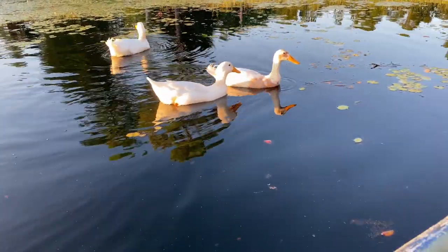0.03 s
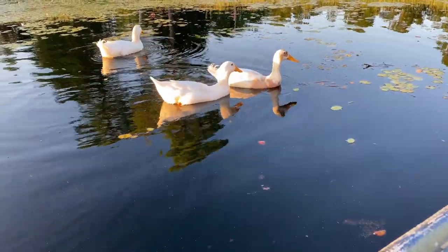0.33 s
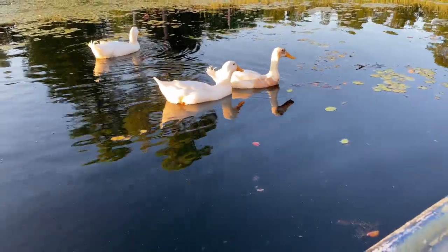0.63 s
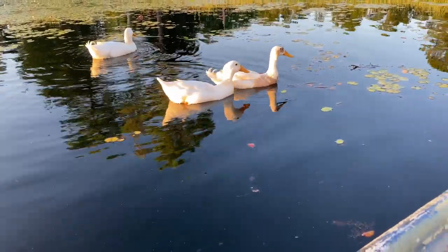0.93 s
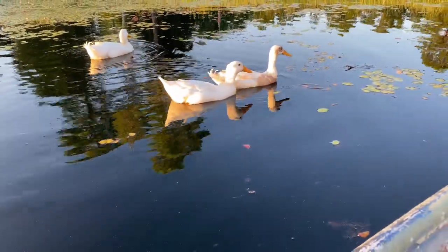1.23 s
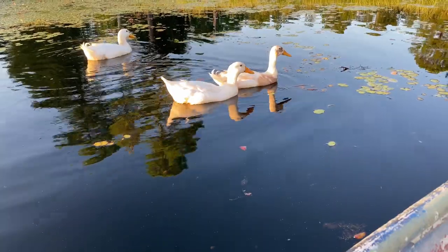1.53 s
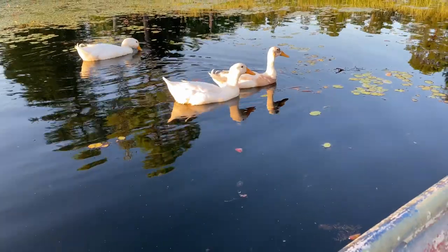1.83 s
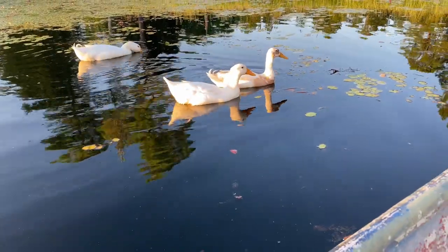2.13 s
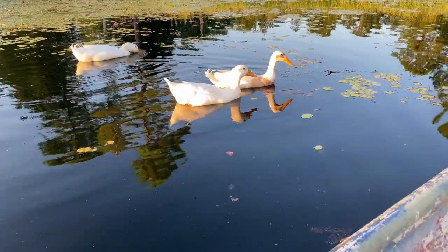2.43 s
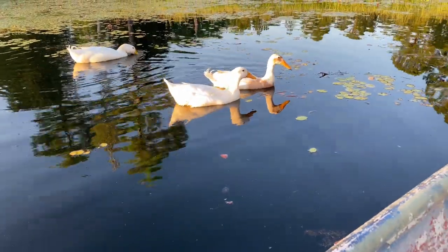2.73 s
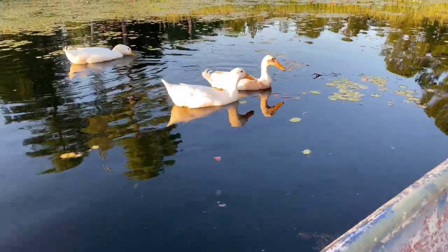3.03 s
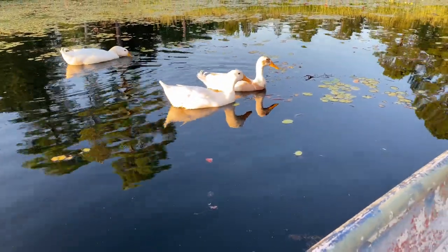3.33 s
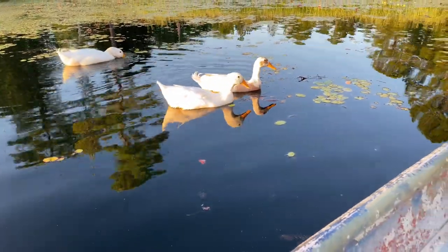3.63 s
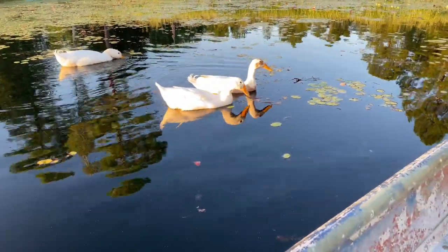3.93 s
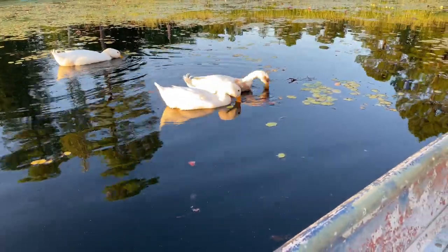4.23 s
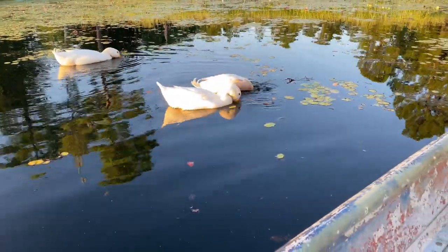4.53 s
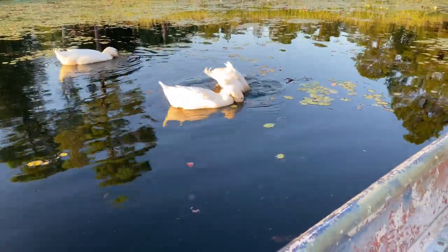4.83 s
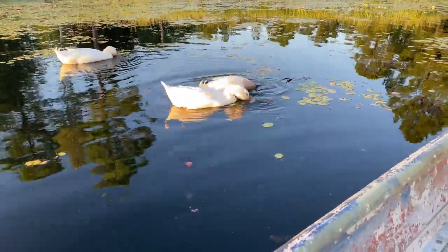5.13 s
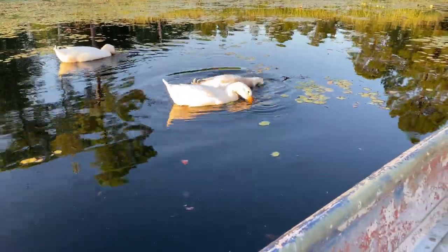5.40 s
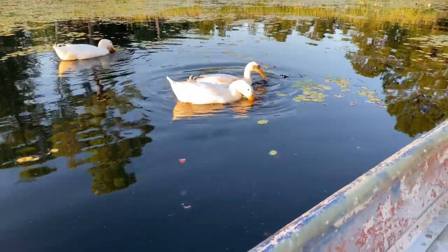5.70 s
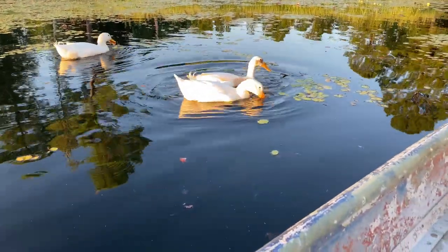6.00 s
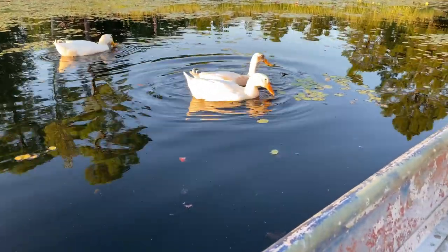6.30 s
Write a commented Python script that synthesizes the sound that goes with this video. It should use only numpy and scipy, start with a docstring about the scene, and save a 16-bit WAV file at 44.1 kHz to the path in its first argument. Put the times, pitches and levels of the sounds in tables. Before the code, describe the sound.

Throughout, a distant engine drones steadily over a low outdoor rumble, the strongest layer in a quiet scene, while a thin, very high hiss like insects comes from the right. In the first half second a duck gives two soft, short, rattling mutters. From about 1.4 seconds, ducks dabbling slightly to the left make sparse, faint drips and splashes, with a small slap at 1.9 and a clearer rising plop at 3.1 seconds. Stirred water crackles finely from about 2.5 seconds on. From 2.7 to 5 seconds a faint songbird trills on the right, rapidly repeating one falling whistled note. Another small splash comes near 4.4 seconds. The drips, bubbly plops and little splashes fall thickest from 5.3 to 6.2 seconds, and the duck mutters softly three more times between 5.7 and 6.2 seconds.

```python
"""Ducks dabble on a still pond. From the start something like a far engine drones over a low rumble,
and a thin hiss, like insects in the reeds, comes from the right. A duck mutters in soft pulses through
its throat; then drops and splashes tick and plop as trapped bubbles ring, and stirred water crackles.
From 2.7 s to 5 s a songbird trills in the trees to the right, repeating one whistled note.
Near the end the drops fall thickest and the duck mutters again."""
import sys
import numpy as np
from scipy import signal
from scipy.fft import rfft, irfft
from scipy.io import wavfile

SR = 44100
rng = np.random.default_rng(int(sys.argv[2]) if len(sys.argv) > 2 else 0)


def wav_out(sig):
    """Save sig, one row per channel (or a flat mono array), as 16-bit PCM at SR to the path in sys.argv[1]."""
    wavfile.write(sys.argv[1], SR, np.round(np.clip(np.atleast_2d(sig).T, -1, 1) * 32767).astype(np.int16))


N = 280476
TIME = np.arange(N) / SR
BIN_HZ = np.maximum(np.arange(N // 2 + 1) * SR / N, 1)

# Drops falling from bills and feathers. Each row: start in seconds, level in dB, starting pitch in Hz,
# ring length in cycles, pitch rise as a share, lag of the right side in ms.
FALLING_DROPS = [(1.3635, -66.5, 3700, 50, .05, 0), (1.9164, -61.5, 4850, 44, .1, 0),
                 (1.9296, -49, 6900, 44, 0, 0), (1.9429, -48, 1350, 4, .2, 0),
                 (2.8887, -62, 4150, 36, .15, 0), (3.1245, -37, 2200, 14, 1.7, .16),
                 (3.9848, -58.5, 4750, 44, .15, 0), (4.3728, -51, 1430, 44, .12, 0),
                 (4.6652, -51.5, 920, 12, .25, 0), (4.7595, -53.5, 1080, 20, .15, 0),
                 (5.3304, -37, 3950, 40, .42, .02), (5.3359, -48.5, 1350, 36, .5, 0),
                 (5.4305, -56.5, 1980, 50, .05, 0), (5.4400, -54, 3100, 40, .35, .02),
                 (5.5265, -56, 3750, 36, .3, 0), (5.5445, -55.5, 4000, 44, .05, 0),
                 (5.587, -55.5, 1300, 44, .05, 0), (5.7235, -51, 1720, 44, .18, 0),
                 (5.7503, -56, 1800, 44, .1, 0), (5.8096, -42, 4750, 44, 0, .03),
                 (5.8188, -54, 4650, 44, .05, .03), (5.8505, -49, 1900, 44, .22, 0),
                 (5.9857, -52, 830, 12, .25, 0), (6.1515, -56, 1380, 30, .1, 0),
                 (6.2135, -59, 3360, 44, .1, 0)]
# A bill, head or foot strikes the water. Each row: time in seconds, slap level in dB, spray level in dB,
# spray rise and decay in seconds, centre frequency in Hz, lag of the right side in ms.
SURFACE_STRIKES = [(1.3637, -65, -78, .01, .01, 3400, 0), (1.9418, -43, -65, .016, .017, 5200, .03),
                   (2.4663, -63, -72, .015, .04, 3900, 0), (2.7013, -60, -69, .01, .035, 4600, 0),
                   (2.938, -62, -64.5, .025, .028, 2400, 0), (3.1248, -41, -64.5, .002, .04, 3500, .06),
                   (3.342, -62, -68, .01, .012, 3200, 0), (3.458, -57, -66, .008, .01, 5000, 0),
                   (4.12, -66, -70.5, .025, .02, 2900, 0), (4.3535, -45.5, -58.5, .01, .026, 3100, .02),
                   (4.6656, -58, -65, .035, .03, 3300, 0), (4.9585, -62, -68, .006, .014, 4900, 0),
                   (5.43, -48, -63, .004, .014, 3700, .02), (5.5259, -57, -66, .012, .012, 3400, 0),
                   (5.655, -47, -60, .003, .007, 4800, 0), (5.797, -61, -65, .05, .03, 2300, 0),
                   (5.8505, -53, -63, .003, .012, 2700, 0), (6.152, -58, -68, .003, .008, 2700, 0)]
# Water welling up around a duck. Each row: time of the crest in seconds, level in dB,
# rise and decay in seconds, centre frequency in Hz.
WELLINGS = [(1.47, -64, .1, 0.062, 890), (2.95, -59, 0.034, 0.019, 800), (4.22, -65.5, .05, 0.037, 1190),
            (4.357, -59.5, .008, 0.028, 1200)]
# Water stirred by feet and bills. Each row: time in seconds, relative level in dB.
STIR_LEVEL = [(0, -97), (2.2, -83), (2.55, -75), (3.8, -74), (4.3, -69.5), (4.7, -71), (5.15, -76),
              (5.5, -72), (5.8, -72), (6.05, -72.5), (6.36, -70.5)]
# The colour of its crackle. Each row: frequency in Hz, relative level in dB.
CRACKLE_SPECTRUM = [(1400, 3), (2500, 6.5), (4000, -2), (5600, 7.5)]
# The duck's rattling calls. Each row: start and length in seconds, level in dB,
# throat resonance near mid-call in Hz, slur between pulses from 0 to 1.
DUCK_CALLS = [(.105, .06, -60.5, 1430, .15), (.328, .06, -59, 1480, .15), (5.655, .078, -57.5, 1660, .45),
              (6.012, .062, -62, 1460, .3), (6.132, .044, -64.5, 1480, .2)]
# One bird note, a low lead-in and a quick downward slur.
# Each row: time from mid-note in seconds, pitch in Hz, relative level in dB.
BIRD_NOTE = [(-.028, 1660, -22), (-.021, 1620, -2.5), (-.014, 1570, -3), (-.0125, 1500, -30),
             (-.012, 2780, -30), (-.008, 2550, 0), (0, 2280, 4), (.005, 2030, 1), (.009, 1700, -5),
             (.014, 1500, -22)]
# Spectrum of the high hiss as heard, with a dip near 12 kHz and an uneven top.
# Each row: frequency in Hz, spectral density in dB.
HEARD_HISS_SPECTRUM = [(4500, -135), (5700, -113), (6500, -101), (7500, -98.5), (8700, -88), (10300, -86),
                       (12200, -89.5), (13200, -77), (14000, -79.5), (15000, -77.5), (15700, -99)]
# Its strength and brightness. Each row: time in seconds, gain in dB, tilt towards the top in dB.
HISS_COURSE = [(0, 0, .3), (1.15, -2.5, -1.2), (1.55, -.2, -1.6), (2.5, 1.3, .9), (3.5, .8, 0),
               (3.8, -.3, -.6), (5.1, -.5, .8), (6.1, 1.6, -.6)]
# Its direction. Each row: frequency in Hz, lag of the right side in ms (negative means earlier).
HISS_DELAY = [(8000, -.297), (12000, -.291), (15700, -.285)]
# The far engine. Each row: time in seconds, relative level in dB.
ENGINE_LEVEL = [(0, -39.5), (.6, -46), (.85, -41.5), (1.45, -39.5), (2.18, -44.5), (2.35, -38.5),
                (3.35, -41), (4.3, -36), (4.85, -40), (5.1, -34), (5.5, -38.5), (6.36, -41)]
# A fainter hum that swells and recedes. Each row: time in seconds, relative level in dB.
HUM_LEVEL = [(0, -66), (2.1, -61.5), (4.1, -55), (6.36, -72)]
# Distant rumble and open air. Each row: frequency in Hz, spectral density in dB.
AIR_SPECTRUM = [(12, -103), (25, -90), (40, -70.5), (49, -64.5), (62, -60.5), (90, -64.5), (125, -76),
                (200, -80), (290, -87), (560, -86), (1000, -93.5), (2000, -108), (3500, -118.5),
                (7000, -122)]
# Its slow swell. Each row: time in seconds, gain in dB.
AIR_GAIN = [(0, 0.5), (.7, -1), (1.5, 0.5), (2, 1), (2.6, -0.5), (3.3, 1.5), (4.1, 1), (4.8, 1), (5.5, 1),
            (6.36, 2)]
# The likeness of its two sides. Each row: frequency in Hz, correlation from 0 to 1.
AIR_COHERENCE = [(45, .985), (80, .96), (130, .92), (290, .65), (640, .12), (1400, 0), (6000, .1)]
# Its balance. Each row: frequency in Hz, left minus right in dB.
AIR_PAN = [(100, 0), (200, 1.8), (700, 2.5), (1300, 1.2), (6000, 1)]

DUCKS_PAN_DB = 2.5  # left minus right


def drops():
    """Drop impact: each drop leaves a bubble ringing and throws up a short, fine spray."""
    out = np.zeros((2, N))
    for start, db, hz, cycles, rise, lag_ms in FALLING_DROPS:
        add(out, start, from_db(db) * place(impact(hz, cycles, rise), DUCKS_PAN_DB, lag_ms))
        add(out, start, from_db(db - 25) * spray(hz, rise_s=.002, decay_s=.022))
    return out + from_db(-17) * scatter(out, t60=.08)


def impact(hz, cycles, rise, splat_s=.0022):
    """Air entrainment: a drop lands with a splat of noise and traps a bubble, which rings."""
    t = np.arange(SR // 10) / SR
    splat = band(rng.standard_normal(len(t)) * np.exp(-t / splat_s), hz * .85, hz * 1.55)
    ring = bubble(hz, t60=cycles / hz, attack_s=3 / hz, rise=rise)
    return peak_one(ring + from_db(-7) * peak_one(splat))


def bubble(hz, t60, attack_s, rise):
    """Damped resonance: trapped air rings, its pitch climbing by the share `rise` as it dies."""
    t = np.arange(SR // 10) / SR
    pitch = hz * (1 + rise * (1 - np.exp(-3 * t / t60)))
    envelope = (1 - np.exp(-(t / attack_s) ** 2)) * from_db(-60 * t / t60)
    return peak_one(envelope) * sine(pitch)


def slaps(crack_s=.0011, thud_s=.0015):
    """Impulsive excitation: struck water cracks and thuds, and the pocket opened in it rings."""
    out, t = np.zeros((2, N)), np.arange(SR // 10) / SR
    for start, db, _, _, _, hz, lag_ms in SURFACE_STRIKES:
        crack = band(rng.choice([-1, 1], len(t)) * np.exp(-t / crack_s), hz * .52, hz * 2)
        thud = band(rng.choice([-1, 1], len(t)) * np.exp(-t / thud_s), hz * .24, hz * .65)
        pocket = bubble(hz * .85, t60=12 / hz, attack_s=1 / hz, rise=.3)
        snap = peak_one(crack) + from_db(-8) * peak_one(thud) + from_db(-6) * pocket
        add(out, start, from_db(db) * place(peak_one(snap), DUCKS_PAN_DB, lag_ms))
    return out + from_db(-13) * scatter(out, t60=.12)


def splashes():
    """Sheet break-up: thrown water parts into spray that is thickest at the slap."""
    out = np.zeros((2, N))
    for crest, _, db, rise_s, decay_s, hz, _ in SURFACE_STRIKES:
        add(out, crest - rise_s, from_db(db - 1) * spray(hz, rise_s, decay_s))
    return out + from_db(-9) * scatter(out, t60=.06)


def sloshes():
    """Displacement: water pushed aside by a duck wells up and settles in a gurgle of larger bubbles."""
    out = np.zeros((2, N))
    for crest, db, rise_s, decay_s, hz in WELLINGS:
        add(out, crest - rise_s, from_db(db) * spray(hz, rise_s, decay_s))
    return out + from_db(-6) * scatter(out, t60=.1)


def spray(hz, rise_s, decay_s, bands=6, half_width=1 / 7):
    """Superposition: droplets ringing over an octave around hz merge into a burst that swells and dies."""
    t = np.arange(int((rise_s + 5 * decay_s) * SR)) / SR
    clicks = fizz(len(t), per_s=1800, size_spread_db=2.5)
    band_of_click = rng.integers(0, bands, len(t))
    droplets = np.zeros((2, len(t)))
    for k, pitch in enumerate(hz * 2 ** np.linspace(-.5, .5, bands)):
        ring = band(clicks * (band_of_click == k), pitch * (1 - half_width), pitch * (1 + half_width))
        droplets += ring / np.sqrt(pitch)
    return rms_one(droplets) * np.minimum(t / rise_s, np.exp((rise_s - t) / decay_s))


def crackle(bands=20, half_width=1 / 8):
    """Bubble resonance: stirred water keeps up a fine crackle of many pitches."""
    stir_db, = in_time(STIR_LEVEL)
    clicks = fizz(N, per_s=2200, size_spread_db=1.6)
    band_of_click = rng.integers(0, bands, N)
    out = np.zeros((2, N))
    for k, hz in enumerate(np.geomspace(1400, 5600, bands)):
        ring = band(clicks * (band_of_click == k), hz * (1 - half_width), hz * (1 + half_width))
        out += from_db(at_hz(CRACKLE_SPECTRUM, hz)) * rms_one(ring)
    out += from_db(-3) * scatter(out, t60=.1)
    lapping_db = 1.6 * drift(8)
    return from_db(stir_db - 1 + lapping_db) * rms_one(out)


def fizz(length, per_s, size_spread_db):
    """A Poisson process: tiny bubbles collapse independently, uneven in size and in direction."""
    sizes = from_db(size_spread_db * np.minimum(rng.exponential(1, length), 4))
    signs = rng.choice([-1, 1], length)
    collapses = rng.random(length) < per_s / SR
    side_db = rng.normal(0, 2.5, length)
    return sizes * signs * collapses * from_db([side_db, -side_db])


def duck(pulses_per_s=60, lower_share=.78, rasp=.06):
    """Amplitude modulation: pulses flutter two rough throat tones that arch as the bill opens and shuts."""
    out = np.zeros(N)
    waver = 1 + rasp * np.array([drift(200), drift(200)])
    effort = from_db(2 * drift(50))
    for start, length, db, open_hz, slur in DUCK_CALLS:
        t = np.arange(int(length * SR)) / SR
        progress, first = t / length, int(start * SR)
        span = slice(first, first + len(t))
        hz = open_hz * np.interp(progress, [0, .25, .55, 1], [.8, 1, .97, .8])
        upper, lower = sine(hz * [[1], [lower_share]] * waver[:, span])
        breath = rms_one(band(rng.standard_normal(len(t)), open_hz * .7, open_hz * 1.15))
        voice = upper + from_db(-3) * lower + from_db(-13) * breath
        pulses = slur + (1 - slur) * np.cos(np.pi * (t - .003) * pulses_per_s) ** 4
        arch = np.sin(np.pi * progress) ** .4
        add(out, start, from_db(db) * rms_one(voice * pulses * arch * effort[span]))
    return out + from_db(-16) * scatter(out, t60=.12)


def songbird(start_s=2.6976, notes=33, beat_s=.06775, swell_db_per_s=.8):
    """Frequency modulation: a gliding whistle repeats in a quickening trill, smeared by the trees."""
    note_s, note_hz, note_db = np.transpose(BIRD_NOTE)
    t = np.arange(note_s[0], note_s[-1], 1 / SR)
    contour_hz, contour_db = np.interp(t, note_s, note_hz), np.interp(t, note_s, note_db)
    lead_in = t < note_s[np.argmax(note_hz)]
    out, now = np.zeros(N), start_s
    for k in range(notes):
        detune = np.where(lead_in, rng.normal(0, .035), rng.normal(0, .028))
        effort_db = -59.5 + swell_db_per_s * (now - start_s) + rng.normal(0, 2)
        add(out, now + note_s[0], from_db(effort_db + contour_db) * sine(contour_hz * (1 + detune)))
        now += beat_s + .0161 * np.exp(-k / 4.6)  # slow at first, settling to an even beat
    # Trees near the bird answer from its own direction, the far banks from all around.
    near = out + from_db(-4) * scatter(out, t60=.4)[0]
    return place(near, pan_db=0, lag_ms=-.205) + from_db(-6.5) * scatter(out, t60=.5)


def high_hiss(split_hz=12000):
    """Localisation by time difference: a smooth, very high hiss reaches the right side first."""
    swell_db, tilt_db = in_time(HISS_COURSE)
    source = noise_bins(HEARD_HISS_SPECTRUM)
    top_share = 1 / (1 + (split_hz / BIN_HZ) ** 10)
    lower = irfft(source * (1 - top_share), N) * from_db(-tilt_db / 2)
    upper = irfft(source * top_share, N) * from_db(tilt_db / 2)
    direct = place(lower + upper, pan_db=0, lag_ms=at_hz(HISS_DELAY, BIN_HZ))
    diffuse = np.array([irfft(noise_bins(HEARD_HISS_SPECTRUM), N) for _ in range(2)])
    return from_db(swell_db) * (direct + from_db(-10) * diffuse)


def motor(levels, start_hz, glide_hz_per_s, gain_db):
    """Attenuation with distance: of a far motor only the fundamental carries, gliding steadily."""
    db, = in_time(levels)
    return np.sqrt(2) * from_db(db + gain_db) * sine(start_hz + glide_hz_per_s * TIME)


def air():
    """A diffuse field: outdoor noise is alike on both sides in the bass and unrelated higher up."""
    coherence, sides = at_hz(AIR_COHERENCE, BIN_HZ), np.array([[1], [-1]])
    common = np.sqrt((1 + coherence) / 2) * noise_bins(AIR_SPECTRUM)
    opposed = sides * np.sqrt((1 - coherence) / 2) * noise_bins(AIR_SPECTRUM)
    balance = from_db(sides * at_hz(AIR_PAN, BIN_HZ) / 2)
    swell_db, = in_time(AIR_GAIN)
    return from_db(swell_db) * irfft((common + opposed) * balance, N)


def scatter(x, t60):
    """Reverberation: diffuse echoes from boat, banks and trees fall by 60 dB in t60 seconds."""
    t = np.arange(SR) / SR
    tail = rng.standard_normal((2, SR)) * from_db(-60 * t / t60) * (1 - np.exp(-t / .004))
    tail /= np.sqrt(np.sum(tail ** 2, axis=1, keepdims=True))
    return signal.fftconvolve(np.atleast_2d(x), tail, axes=1)[:, :N]


def place(x, pan_db, lag_ms):
    """Binaural cues: the left side is louder by pan_db and the right side later by lag_ms."""
    hz = np.arange(len(x) // 2 + 1) * SR / len(x)
    delayed = irfft(rfft(x) * np.exp(-2j * np.pi * hz * lag_ms / 1000), len(x))
    return np.array([x * from_db(pan_db / 2), delayed * from_db(-pan_db / 2)])


def noise_bins(density):
    """Spectral shaping: the Fourier bins of a noise with the given density in dB."""
    return rfft(rng.standard_normal(N)) * np.sqrt(SR / 2) * from_db(at_hz(density, BIN_HZ))


def drift(corner_hz):
    """Random fluctuation: low-passed noise of unit power."""
    return rms_one(irfft(rfft(rng.standard_normal(N)) / (1 + (BIN_HZ / corner_hz) ** 2), N))


def sine(hz):
    """Oscillation: phase is the running integral of frequency."""
    return np.sin(2 * np.pi * np.cumsum(hz, axis=-1) / SR)


def band(x, low_hz, high_hz):
    """Band-pass filtering with gentle slopes."""
    return signal.sosfilt(signal.butter(2, [low_hz, high_hz], "band", fs=SR, output="sos"), x + 1e-18)


def add(out, start_s, sound):
    """Superposition of a short sound on the mix."""
    first = max(round(start_s * SR), 0)
    out[..., first:first + sound.shape[-1]] += sound[..., :max(N - first, 0)]


def in_time(rows):
    """Linear interpolation of each column at every sample."""
    seconds, *columns = np.transpose(rows)
    return [np.interp(TIME, seconds, column) for column in columns]


def at_hz(rows, hz):
    """Interpolation on a logarithmic frequency axis."""
    row_hz, values = np.transpose(rows)
    return np.interp(np.log(hz), np.log(row_hz), values)


def from_db(db):
    """Amplitude ratio of a level in decibels."""
    return 10 ** (np.asarray(db) / 20)


def rms_one(x):
    """Normalisation to unit power."""
    return x / np.sqrt(np.mean(x ** 2) + 1e-20)


def peak_one(x):
    """Normalisation to unit peak."""
    return x / np.abs(x).max()


def scene():
    """Superposition: the pond in front, the bird and the distant noises add as pressures."""
    engine = motor(ENGINE_LEVEL, start_hz=80.68, glide_hz_per_s=-.4, gain_db=-.2)
    hum = motor(HUM_LEVEL, start_hz=145.6, glide_hz_per_s=.8, gain_db=-1.5)
    water = drops() + slaps() + splashes() + sloshes() + crackle()
    background = air() + high_hiss() + engine + hum
    return water + duck() + songbird() + background


def record(dry, cutoff_hz=15650):
    """Band limiting: a steep low-pass filter removes the highest treble."""
    return signal.sosfilt(signal.ellip(12, .1, 80, cutoff_hz, fs=SR, output="sos"), dry)


dry = scene()
out = record(dry)
wav_out(out)
```